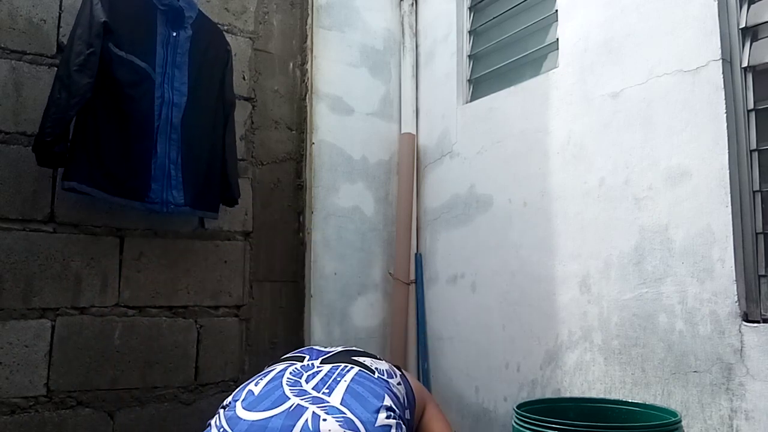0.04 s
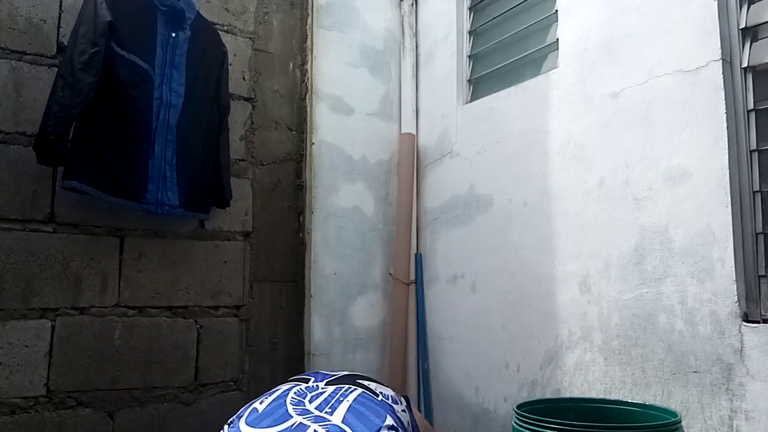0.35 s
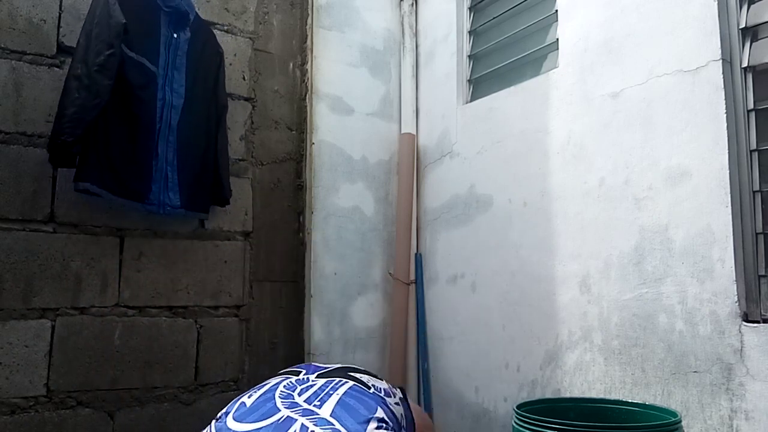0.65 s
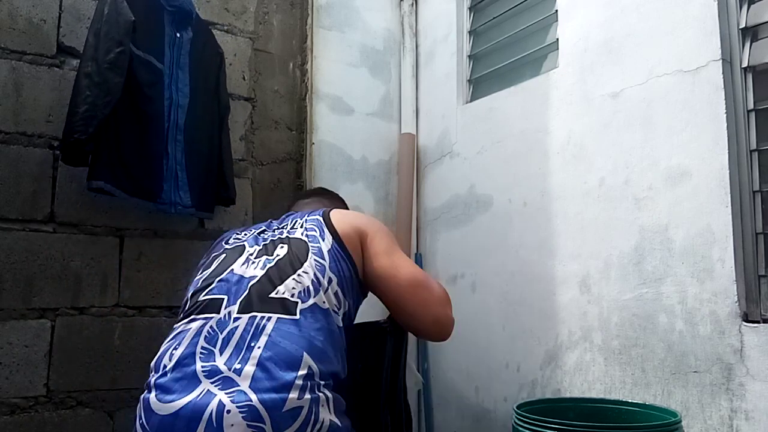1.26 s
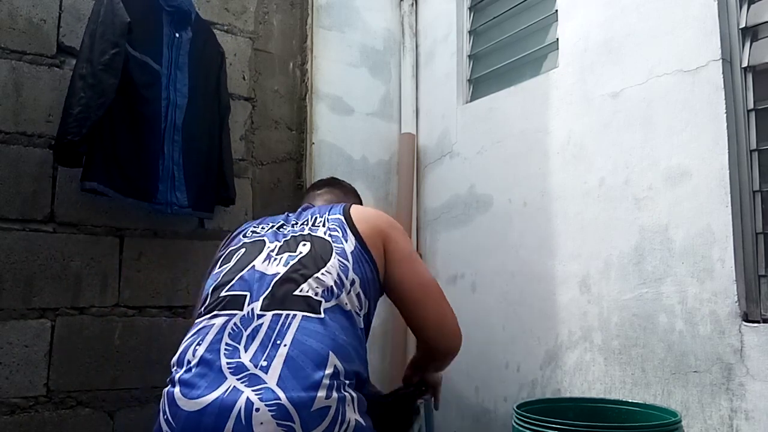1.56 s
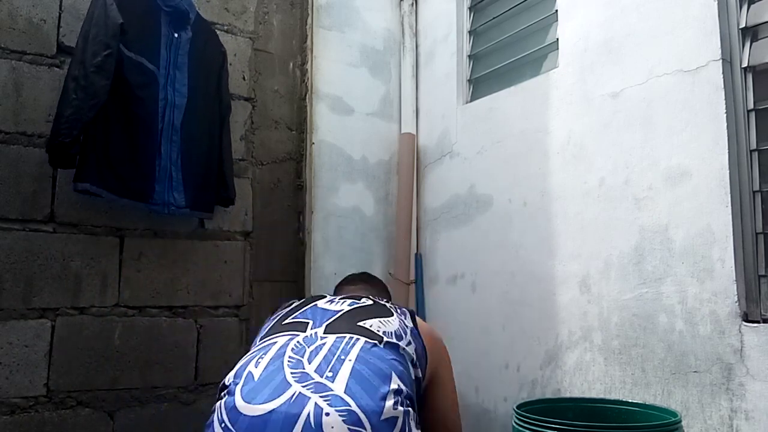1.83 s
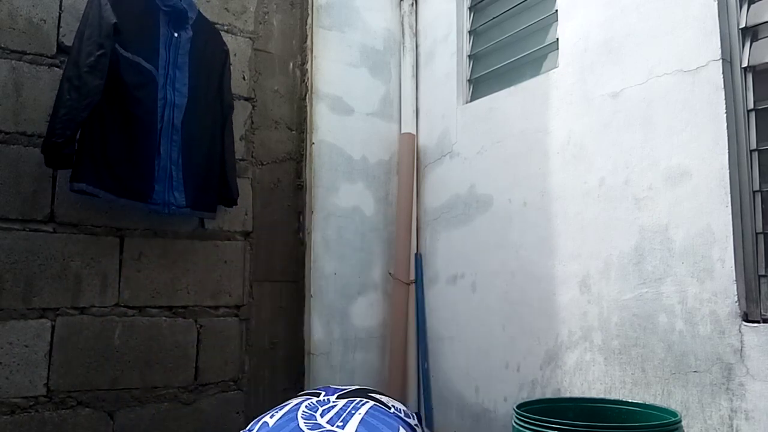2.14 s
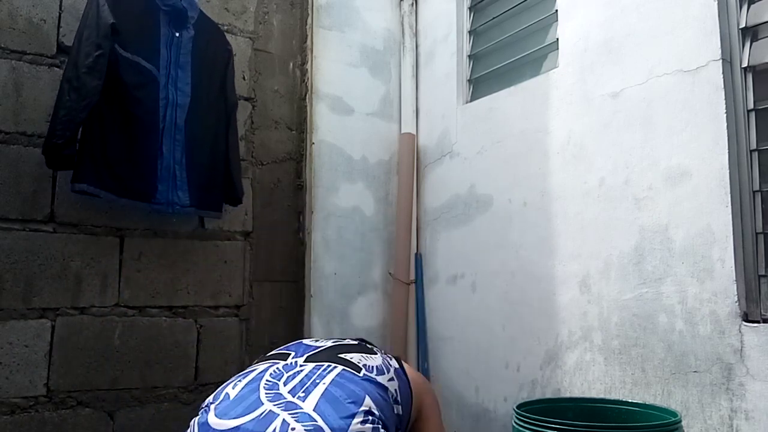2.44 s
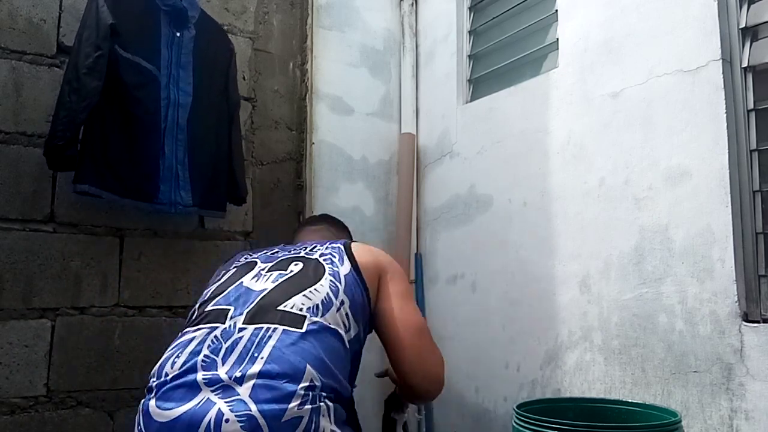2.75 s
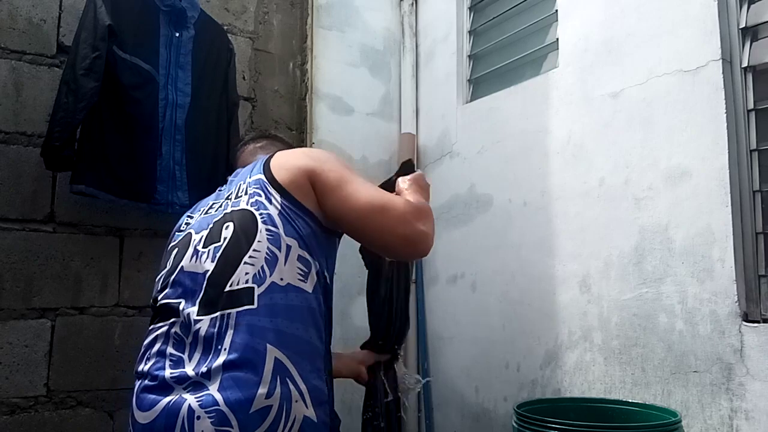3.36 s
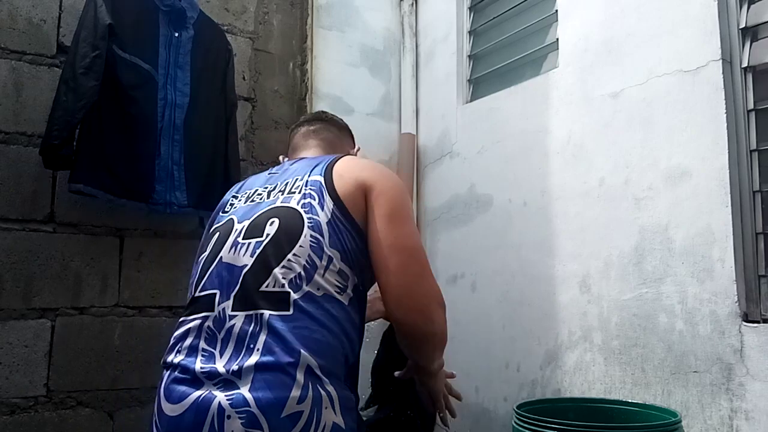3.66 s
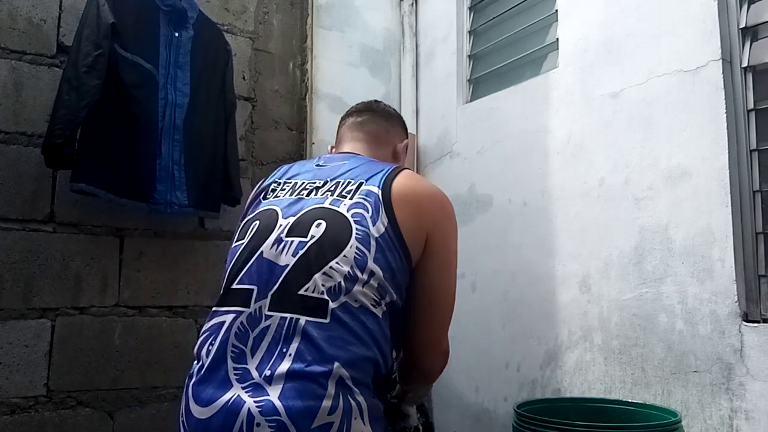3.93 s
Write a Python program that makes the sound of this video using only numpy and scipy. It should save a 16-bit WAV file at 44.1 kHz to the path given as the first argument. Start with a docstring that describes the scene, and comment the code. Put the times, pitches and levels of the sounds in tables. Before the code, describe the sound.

Water sloshes and gurgles softly as laundry is dunked in a tub for the first second. Lifted cloth drips and spatters from about 1.2 seconds, then plunges back with the loudest splashes around 1.8. After more bubbling, the cloth is wrung out from about 2.7 to 4 seconds, water trickling and pattering into the tub. The sound sits slightly right, with short echoes from close yard walls.

```python
"""Wringing laundry over a tub

Wet cloth is dunked, lifted and wrung out in a narrow concrete yard, and plunges back in once.
Entrained air rings as bubbles, the water sloshes, and run-off patters and drums into the tub.
The tub stands low and off the axis of a wide microphone pair; bare walls reflect the sound."""
import sys
import numpy as np
from scipy import signal
from scipy.io import wavfile
from scipy.ndimage import uniform_filter1d

SR = 44100
rng = np.random.default_rng(int(sys.argv[2]) if len(sys.argv) > 2 else 0)


def generate_wav(signal):
    """Clip the signal to [-1, 1] and save it as 16-bit WAV at the path in sys.argv[1]."""
    frames = np.transpose(np.atleast_2d(signal))
    scaled = np.clip(frames, -1, 1) * 32767
    pcm = np.round(scaled).astype(np.int16)
    wavfile.write(sys.argv[1], SR, pcm)


N = 176400

# air churned into the water: t/s, relative level/dB
CHURN_LEVEL = [(0.0, -56.5), (0.05, -57.5), (0.22, -57), (0.24, -39.5), (0.28, -52.5), (0.47, -47.5),
               (0.61, -58.5), (0.66, -48.5), (0.73, -52.5), (0.77, -40.5), (0.82, -53), (0.835, -45),
               (0.855, -45.5), (0.885, -44), (0.93, -44), (1.05, -44.5), (1.17, -53.5), (1.41, -47),
               (1.61, -44.5), (1.722, -50), (1.735, -37.5), (1.79, -39.5), (1.84, -38), (1.94, -49.5),
               (2.0, -40), (2.04, -48), (2.16, -44), (2.21, -47.5), (2.32, -61), (2.53, -43), (2.62, -47.5),
               (2.85, -43), (3.13, -51.5), (3.21, -45), (3.52, -40.5), (3.72, -49), (3.77, -43),
               (3.89, -71), (4.0, -45.5)]
# pitch of the smallest bubbles, lower while the cloth is under water: t/s, f/Hz
TOP_PITCH = [(0.8, 2350), (0.9, 1496), (1.1, 1606), (1.3, 2390), (1.85, 2320), (1.97, 1474), (2.06, 1335),
             (2.13, 1560), (2.22, 1740), (2.55, 2410)]
# pitch around which bubbles cluster as the cloth moves: t/s, f/Hz
CLUSTER_PITCH = [(0.0, 1250), (0.24, 1430), (0.30, 930), (0.39, 753), (0.46, 1190), (0.70, 1220),
                 (0.75, 950), (0.83, 1350), (0.90, 1220), (1.08, 945), (1.25, 1170), (1.45, 1210),
                 (1.58, 866), (1.68, 1160), (1.74, 790), (1.88, 875), (2.0, 1090), (2.1, 1210),
                 (2.21, 1410), (2.32, 1160), (2.55, 1220), (2.74, 850), (2.88, 830), (3.05, 1117),
                 (3.22, 1140), (3.44, 1114), (3.55, 1395), (3.72, 940), (4.0, 870)]
# spectral weighting of the loose bubbles: f/Hz, level/dB
BUBBLE_SPECTRUM = [(500, -2.5), (750, -3), (900, -7), (1200, 1.5), (1500, 0.5), (1900, 0), (2400, -7)]
def gurgle():
    """Bubble resonance: air churned in by the cloth rings at pitches set by bubble size."""
    loose = swarm(598, track(TOP_PITCH), per_s=1500, spread_db=3, cycles=8.3, rise=0.025)
    loose = unit_rms(colour(loose, BUBBLE_SPECTRUM))
    hz = track(CLUSTER_PITCH)
    cluster = swarm(hz * 0.87, hz * 1.13, per_s=510, spread_db=-0.5, cycles=6.1, rise=0.021)
    bubbles = amp(-2) * loose + amp(-8.5) * cluster
    return scatter(bubbles * amp(track(CHURN_LEVEL)), wet_db=-3, spots=7)


# single bubbles: t/s, level/dB, f/Hz, decay time/cycles
SINGLE_BUBBLES = [(0.073, -38, 5050, 22), (0.122, -41.5, 553, 8.5), (0.157, -41.5, 530, 7.1),
                  (0.381, -36, 2870, 14), (0.2401, -27, 1784, 6.4), (0.2417, -26, 1210, 1.4),
                  (0.253, -31.5, 1620, 9), (0.424, -36.5, 935, 6.3), (0.692, -34, 1420, 5.6),
                  (0.761, -36.5, 2100, 10), (0.828, -21.5, 1450, 2.7), (0.87, -30, 1140, 4.8),
                  (0.893, -37, 775, 6.6), (0.892, -27, 1190, 3.2), (0.912, -36.5, 690, 21),
                  (0.944, -34, 1220, 7.2), (1.015, -35, 1210, 7), (1.036, -40, 877, 12),
                  (1.321, -26, 2200, 6), (1.384, -28.5, 1810, 8.7), (1.384, -26, 750, 2.8),
                  (1.408, -24.5, 1598, 11), (1.54, -31, 775, 2.5), (1.726, -20.5, 744, 4.5),
                  (1.749, -20.5, 780, 2.1), (1.797, -28, 855, 12.4), (1.809, -22, 616, 4),
                  (1.804, -25, 3800, 14), (1.832, -27, 1160, 6), (1.95, -34.5, 867, 6.4),
                  (1.993, -32.5, 1230, 6.7), (2.042, -32.5, 1340, 7.8), (2.085, -34, 1112, 13),
                  (2.18, -39, 351, 4), (2.206, -35.5, 1490, 22), (2.663, -34, 714, 7.6),
                  (2.885, -35.5, 1936, 17), (3.19, -34, 1995, 12), (3.211, -32, 1260, 6.3),
                  (3.256, -31.5, 1230, 8.6), (3.277, -33, 3183, 27), (3.464, -33.5, 1175, 12),
                  (3.841, -27, 3960, 18)]
def plops():
    """Free oscillation: single bubbles, each excited once, ring out above the gurgle."""
    out = np.zeros(N)
    for s, db, hz, cycles in SINGLE_BUBBLES:
        add(out, s, amp(db) * bubble(hz, cycles, rise=0.01))
    return yard(out, wet_db=-8.5)


# fine spray of falling water: t/s, relative level/dB
SPRAY_LEVEL = [(0.0, -55.5), (0.14, -56), (0.22, -55.5), (0.24, -49), (0.42, -59.5), (0.47, -45.5),
               (0.57, -69.5), (0.62, -65), (0.655, -53), (0.95, -43), (1.05, -46), (1.14, -39.5),
               (1.31, -38), (1.32, -36), (1.37, -41.5), (1.55, -41.5), (1.58, -39.5), (1.722, -40),
               (1.735, -34.5), (1.765, -37), (1.8, -35.5), (1.88, -36.5), (1.94, -50.5), (2.0, -40),
               (2.11, -57), (2.21, -39.5), (2.25, -44.5), (2.31, -50.5), (2.44, -47), (2.7, -49),
               (2.81, -41.5), (3.11, -43.5), (3.13, -47.5), (3.19, -40.5), (3.48, -42), (4.0, -41.5)]
# spectrum of drop impacts: f/Hz, level/dB
DROP_SPECTRUM = [(300, -39.5), (700, -7.5), (1400, -4.5), (2400, -3), (3200, -1), (4300, -0.5), (5500, -2),
                 (6700, 0.5), (7900, -5), (9000, -3.5), (10500, -14), (13500, -24), (14800, -17.5),
                 (16000, -17)]
def spray():
    """Impact and entrainment: drops tick on the water and leave tiny fizzing bubbles."""
    ticks = unit_rms(clicks(per_s=2400, spread_db=4))
    fizz = swarm(2193, 9830, per_s=570, spread_db=3.5, cycles=10.2, rise=0.018)
    patter = unit_rms(colour(ticks + amp(-13.5) * fizz, DROP_SPECTRUM))
    return scatter(patter * amp(track(SPRAY_LEVEL) + 1.5), wet_db=1)


# blows on the surface: t/s, relative slap level/dB, relative spatter level/dB, decay time/s
IMPACTS = [(0.149, -58, -44.5, 0.01), (0.231, -47, -48, 0.013), (0.2404, -39, -46, 0.0053),
           (0.29, -51, -41.5, 0.011), (0.457, -40, -38.5, 0.0072), (0.645, -50, -48.5, 0.039),
           (0.745, -43, -60, 0.018), (0.831, -30, -51, 0.0037), (0.8933, -29.5, -48, 0.0053),
           (1.245, -49, -26.5, 0.005), (1.321, -63, -27.5, 0.011), (1.57, -35.5, -31.5, 0.016),
           (1.729, -36, -25.5, 0.014), (1.78, -33, -30.5, 0.025), (1.803, -36, -34, 0.013),
           (1.830, -34, -30, 0.013), (2.183, -36.5, -47, 0.036), (2.887, -58, -37, .006),
           (2.941, -56, -32, 0.0055), (3.085, -55, -44, 0.0067), (3.141, -43, -31, 0.0095),
           (3.179, -43, -35, 0.086), (3.540, -46, -34.5, 0.019), (3.615, -44, -34, .012),
           (3.838, -63, -32.5, 0.0097), (3.884, -58, -46, 0.0051)]
# spectrum of the hollow slap: f/Hz, level/dB
SLAP_SPECTRUM = [(100, -30), (400, -0.5), (560, -5), (780, 6), (1200, 7), (1900, -4), (2800, -10),
                 (8000, -31.5)]
def slaps(size=8000, attack_s=0.0007):
    """Impact noise: cloth and gouts of water hit the surface with a hollow burst and bright spatter."""
    out, t = np.zeros(N), np.arange(size) / SR
    for s, slap_db, spatter_db, decay_s in IMPACTS:
        hollow = amp(slap_db) * unit_rms(colour(rng.standard_normal(size), SLAP_SPECTRUM))
        spatter = amp(spatter_db) * unit_rms(colour(rng.standard_normal(size), DROP_SPECTRUM))
        envelope = np.minimum(t / attack_s, 1) * np.exp(-t / decay_s)
        add(out, s, (hollow + spatter) * envelope)
    return yard(out * amp(-1.5), wet_db=-3)


# thick water falling into the tub: t/s, relative level/dB
POUR_LEVEL = [(0.0, -58), (0.08, -66), (0.12, -56), (0.42, -49.5), (0.58, -67), (0.88, -44.5), (0.92, -42),
              (1.29, -59), (1.39, -53), (1.41, -51), (1.59, -43), (1.68, -62), (1.718, -63), (1.73, -37),
              (1.81, -38.5), (1.87, -37.5), (1.93, -57.5), (2.04, -45), (2.08, -53.5), (2.19, -46.5),
              (2.29, -64), (2.52, -46.5), (2.58, -56), (2.7, -44.5), (3.2, -50), (3.71, -45.5), (3.78, -57),
              (4.0, -51.5)]
# pitch of the drumming, lower under the steady run-off: t/s, f/Hz
POUR_PITCH = [(0.15, 526), (0.42, 666), (0.9, 696), (1.6, 720), (1.8, 693), (2.5, 684), (2.7, 680),
              (2.85, 630), (3.0, 584), (4.0, 623)]
def pour():
    """Heavily damped resonance: thick run-off drums hollowly, each ring dying within a few cycles."""
    hz = track(POUR_PITCH)
    drum = swarm(hz * 0.917, hz * 1.083, per_s=420, spread_db=3, cycles=1.35, rise=0.002)
    return yard(drum * amp(track(POUR_LEVEL) - 2.5), wet_db=-6, lag_s=0.00096)


# steady run-off from the wrung cloth: t/s, level/dB
RUNOFF_LEVEL = [(2.4, -82), (2.7, -55.5), (2.85, -51), (3.1, -40), (3.2, -46), (3.6, -42.5), (4.0, -39.5)]
# spectrum of its hiss: f/Hz, level/dB
RUNOFF_SPECTRUM = [(200, -29), (330, -11), (480, -10), (620, -2), (1000, -5.5), (2400, -6), (4300, -6),
                   (5500, 2), (6600, 5.5), (7900, -1.5), (9000, 4), (10500, -9), (13500, -18), (14800, -16),
                   (16000, -3)]
def runoff(spurt_db=3.5):
    """Shot noise: a thin stream falls in spurts and breaks into drops whose ticks merge into hiss."""
    hiss = unit_rms(colour(clicks(per_s=10000, spread_db=2.5), RUNOFF_SPECTRUM))
    spurts = unit_rms(uniform_filter1d(uniform_filter1d(rng.standard_normal(N), size=900), size=300))
    return scatter(hiss * amp(track(RUNOFF_LEVEL) + spurt_db * spurts), wet_db=9)


# heave of the water in the tub: t/s, level/dB
HEAVE_LEVEL = [(0.0, -58), (0.1, -63), (0.44, -56.5), (0.56, -62.5), (0.67, -59), (0.81, -50),
               (0.96, -67.5), (0.99, -53.5), (1.15, -65), (1.2, -79), (1.23, -68), (1.255, -57.5),
               (1.53, -61), (1.79, -51), (1.92, -55.5), (2.21, -53), (2.41, -67.5), (2.44, -52),
               (2.64, -66), (3.68, -56), (4.0, -61)]
# spectrum of the heave: f/Hz, level/dB
HEAVE_SPECTRUM = [(20, -55), (40, -39), (65, -12), (90, 3), (120, 1), (170, 1.5), (220, -6), (330, -12.5),
                  (450, -8), (900, -34.5), (4000, -67)]
# air trapped under the cloth: t/s, level/dB, f/Hz
AIR_POCKETS = [(0.0, -42.5, 114), (0.624, -36.5, 160), (0.789, -42.5, 160), (0.811, -37, 170),
               (0.979, -48, 131), (1.732, -39, 127), (1.768, -40, 136), (1.815, -41, 122),
               (1.875, -42.5, 110), (1.978, -42, 113), (2.171, -40, 168)]
def slosh(gulp_cycles=3.23, gulp_rise=0.17):
    """Low-frequency oscillation: the water heaves, and trapped air gulps out in soft, rising tones."""
    heave = unit_rms(colour(clicks(per_s=1300, spread_db=0.5), HEAVE_SPECTRUM))
    heave *= amp(track(HEAVE_LEVEL))
    gulps = np.zeros(N)
    for s, db, hz in AIR_POCKETS:
        progress = np.arange(0, 1, hz / gulp_cycles / SR)
        turns = gulp_cycles * progress * (1 + gulp_rise * (progress - 1) / 2)
        add(gulps, s, amp(db) * np.sin(np.pi * progress) ** 2 * np.sin(2 * np.pi * turns))
    return scatter(heave, wet_db=-7, spots=3, hold=2000) + yard(gulps, wet_db=-16.5, lag_s=0.0016)


# big bubbles forced under the surface: t/s, relative level/dB
BURBLE_LEVEL = [(0.0, -81), (0.43, -54.5), (0.54, -82), (0.8, -74), (0.95, -64), (1.26, -70.5), (1.84, -47),
                (1.95, -63), (1.98, -50), (2.14, -55), (2.18, -44.5), (2.28, -66.5), (2.82, -55.5),
                (4.0, -68)]
def burble():
    """Resonance falls with size: big bubbles driven down by water or cloth ring low and briefly."""
    deep = swarm(282.6, 486, per_s=260, spread_db=3.5, cycles=2.5, rise=0.019)
    return yard(deep * amp(track(BURBLE_LEVEL) - 2.5), wet_db=-13.5)


# spectrum of the outdoor background: f/Hz, level/dB
AIR_SPECTRUM = [(20, -33), (60, -32), (110, 0.5), (250, -2), (600, -5.5), (1500, -4.5), (4000, -6.5),
                (9000, -21), (16000, -44)]
def air():
    """Ambient noise: a faint, steady background, uncorrelated between the microphones."""
    return amp(-58.5) * np.array([unit_rms(colour(z, AIR_SPECTRUM)) for z in rng.standard_normal((2, N))])


def bubble(hz, cycles, rise):
    """Damped oscillator: an air pocket whose pitch climbs by the fraction `rise` per decay time."""
    age = np.arange(0, 6 * cycles, hz / SR)  # in cycles, over six decay times
    envelope = (1 - np.exp(-2 * age)) * np.exp(-age / cycles)
    wall = envelope * np.sin(2 * np.pi * age * (1 + rise * age / cycles / 2))
    return np.gradient(wall, age) / (2 * np.pi)  # the motion of the wall radiates


def clicks(per_s, spread_db):
    """Poisson process: independent impulses of random sign and size."""
    size = amp(spread_db * np.minimum(rng.exponential(1, N), 3.2))
    return size * rng.choice([-1, 1], N) * (rng.random(N) < per_s / SR)


def swarm(lo_hz, hi_hz, per_s, spread_db, cycles, rise):
    """Incoherent sum: bubbles of many sizes are born at random moments."""
    births, out = clicks(per_s, spread_db), np.zeros(N)
    place, life = rng.random((2, N))
    pitch = lo_hz + (hi_hz - lo_hz) * place
    for i in np.flatnonzero(births):
        ring = bubble(pitch[i], cycles * (0.5 + life[i]), rise)
        add(out, i / SR, births[i] * ring / np.linalg.norm(ring))
    return unit_rms(out)


# reverberation of the yard: f/Hz, T60/s
REVERB_TIME = [(100, 0.78), (700, 0.2), (2500, 0.17), (7000, 0.074), (15000, 0.063)]
def yard(x, wet_db, lag_s=0.000988, early_s=0.0087, early_db=8, size=9000):
    """Reflection: close walls add dense early echoes and a short tail to the direct sound."""
    t = np.arange(size) / SR
    onset = np.clip(t / 0.0024 - 1, 0, 1)
    taps = rng.standard_normal((2, size)) * onset * (1 + amp(early_db) * np.exp(-t / early_s))
    hz, age, bands = signal.stft(taps, SR, nperseg=256)
    decay = np.exp(-np.log(1000) * age / at_frequency(REVERB_TIME, hz)[:, None])
    response = signal.istft(bands * decay, SR, nperseg=256)[1]
    response *= amp(wet_db) / np.linalg.norm(response, axis=1, keepdims=True)
    right_lag_s = abs(lag_s + 0.00013 * rng.uniform(-1, 1))
    response[0, 0] += 1  # the direct sound reaches the left microphone first
    response[1, round(right_lag_s * SR)] += 1
    return signal.oaconvolve(x[None], response, axes=1)[:, :N] / np.sqrt(1 + amp(wet_db) ** 2)


def scatter(x, wet_db, spots=5, hold=300):
    """Changing paths: the sound moves among spots in the tub, each with its own echoes."""
    spot = np.repeat(rng.integers(0, spots, N // hold + 1), hold)[:N]
    shares = (abs(uniform_filter1d(1.0 * (spot == k), hold // 2)) for k in range(spots))
    return sum(yard(x * np.sqrt(share), wet_db) for share in shares)


def amp(db):
    """Amplitude ratio of a level in decibels."""
    return 10 ** (np.asarray(db) / 20)


def unit_rms(x):
    """Normalisation to an rms of 1."""
    return x / np.sqrt(np.mean(x ** 2) + 1e-20)


def track(curve):
    """Linear interpolation of a time curve at every sample."""
    return np.interp(np.arange(N) / SR, *np.transpose(curve))


def at_frequency(points, hz):
    """Interpolation on a logarithmic frequency axis."""
    f, value = np.transpose(points)
    return np.interp(np.log(hz + 1), np.log(f + 1), value)


def add(mix, s, sound):
    """Superposition of a sound on the mix, starting at s seconds."""
    part = mix[max(round(s * SR), 0):][:len(sound)]
    part += sound[:len(part)]


def colour(x, spectrum, size=4096):
    """Minimum-phase filtering with the given spectrum."""
    log_gain = np.log(amp(at_frequency(spectrum, abs(np.fft.fftfreq(size, 1 / SR)))))
    taps = np.fft.ifft(np.exp(np.conj(signal.hilbert(log_gain)))).real[:size // 2]
    return signal.fftconvolve(x, taps)[:len(x)]


def scene():
    """Superposition: the water sounds and the background add at each microphone."""
    return spray() + runoff() + gurgle() + pour() + burble() + plops() + slaps() + slosh() + air()


# left channel minus right: f/Hz, level/dB
CHANNEL_DIFFERENCE = [(30, 13), (70, 1.5), (130, -6), (220, 0.5), (350, -3.5), (700, -7.5), (1200, -7),
                      (1900, -6), (2400, -3.5), (4300, -6.5), (7000, -7), (9200, -5), (11000, -10.5),
                      (15000, -19.5)]
def record(dry, cutoff_hz=15750):
    """Level difference and band limit: the left side is weaker and duller, and both are low-passed."""
    left = colour(dry[0], [(hz, db / 2) for hz, db in CHANNEL_DIFFERENCE])
    right = colour(dry[1], [(hz, -db / 2) for hz, db in CHANNEL_DIFFERENCE])
    low_pass = signal.firwin(511, cutoff_hz, window=("kaiser", 9), fs=SR)
    return signal.oaconvolve(np.array([left, right]), low_pass[None], "same", axes=1)


dry = scene()
out = record(dry)
generate_wav(out)
```